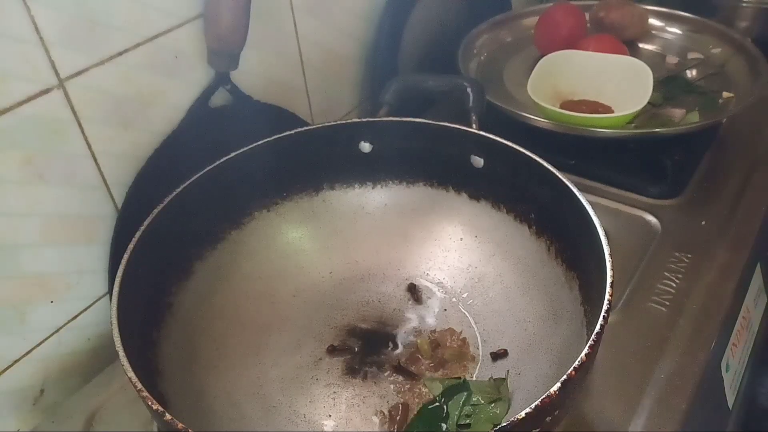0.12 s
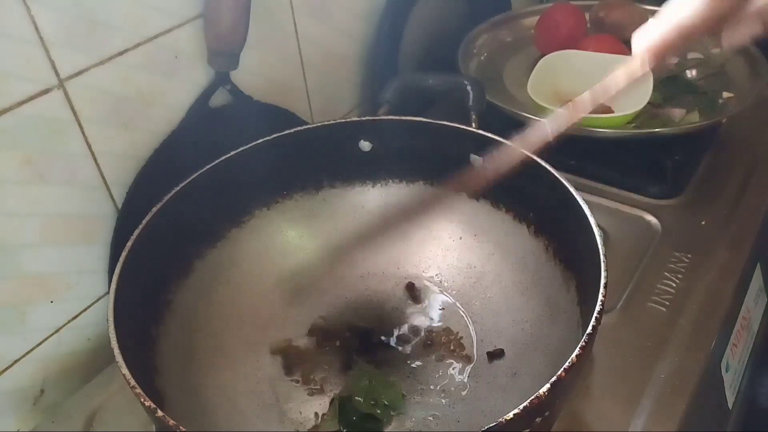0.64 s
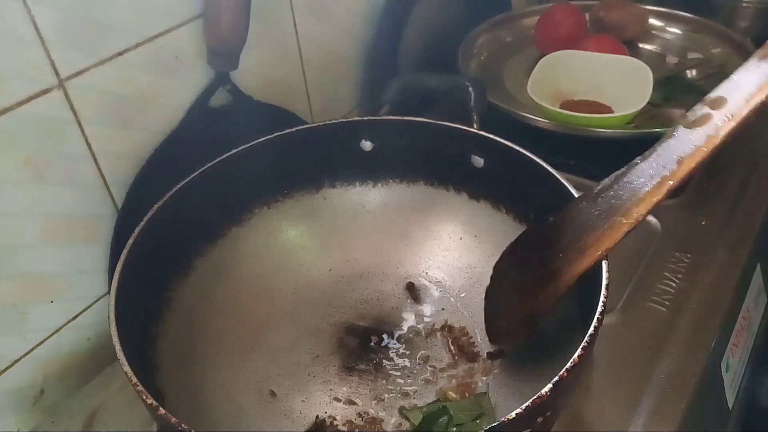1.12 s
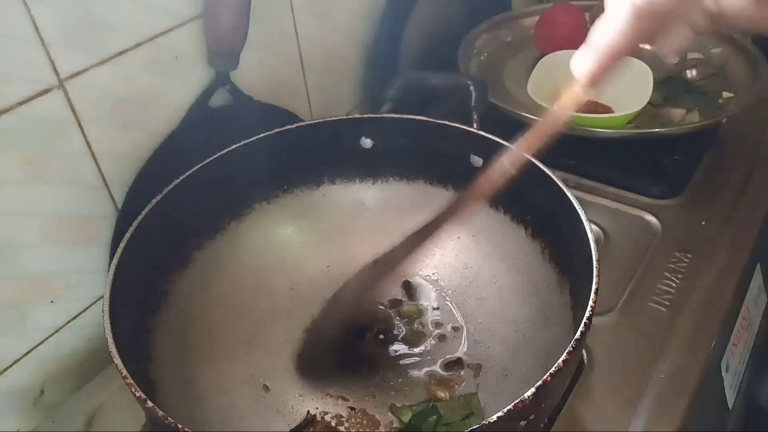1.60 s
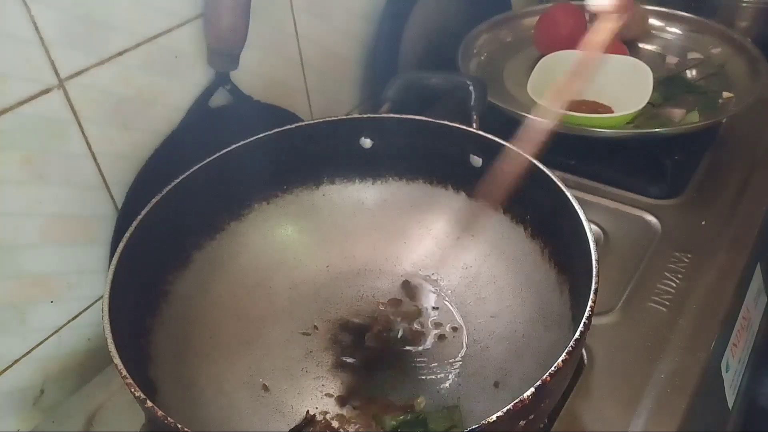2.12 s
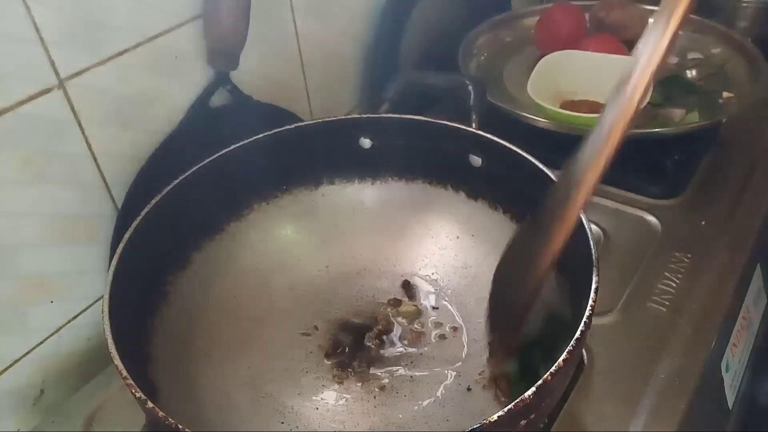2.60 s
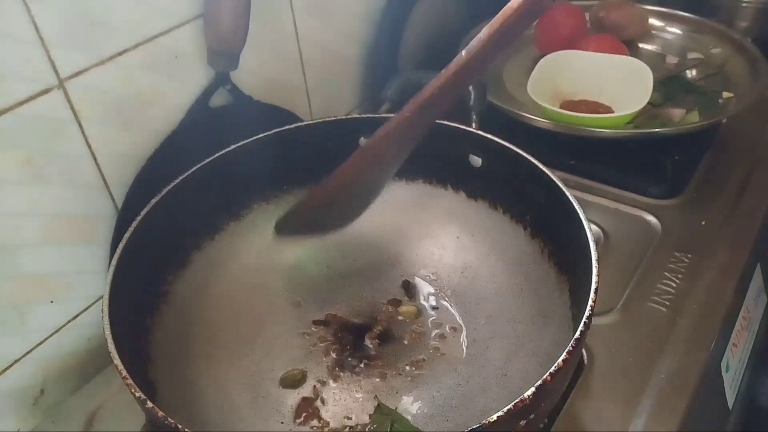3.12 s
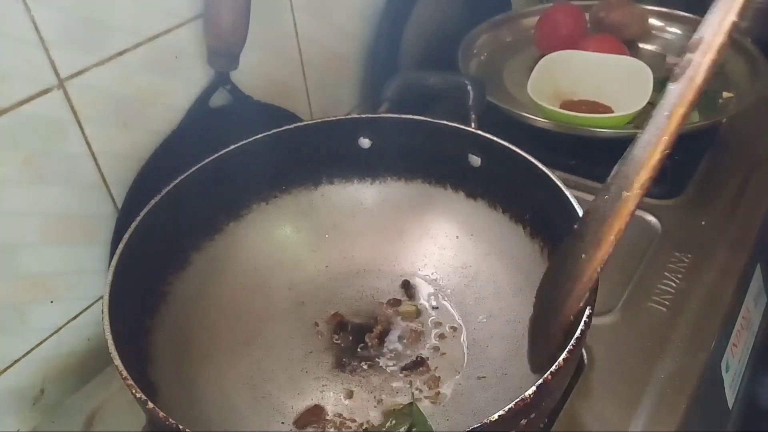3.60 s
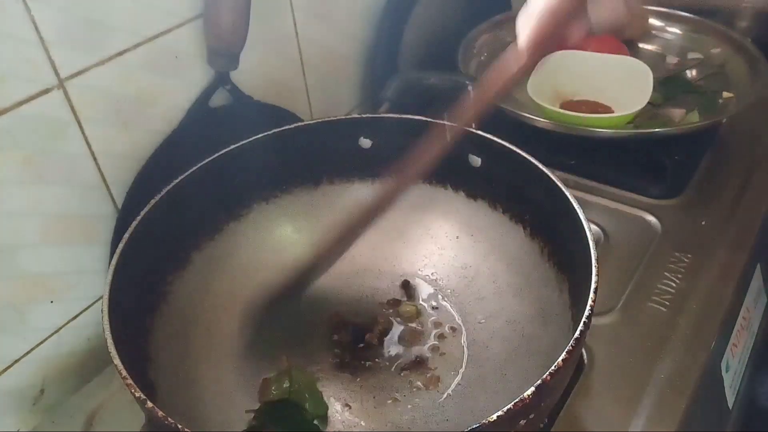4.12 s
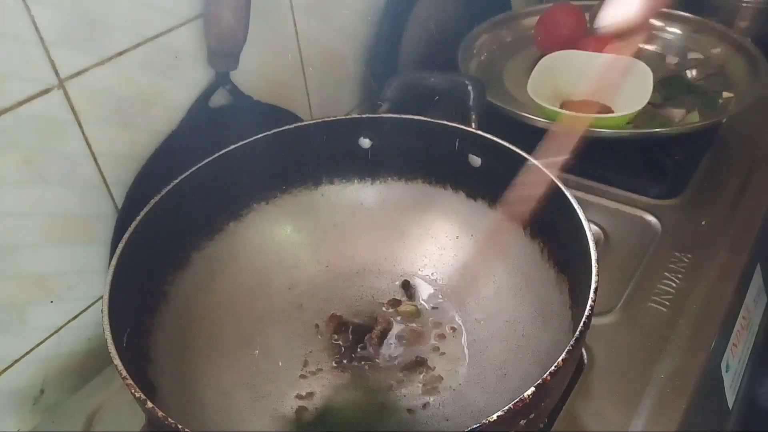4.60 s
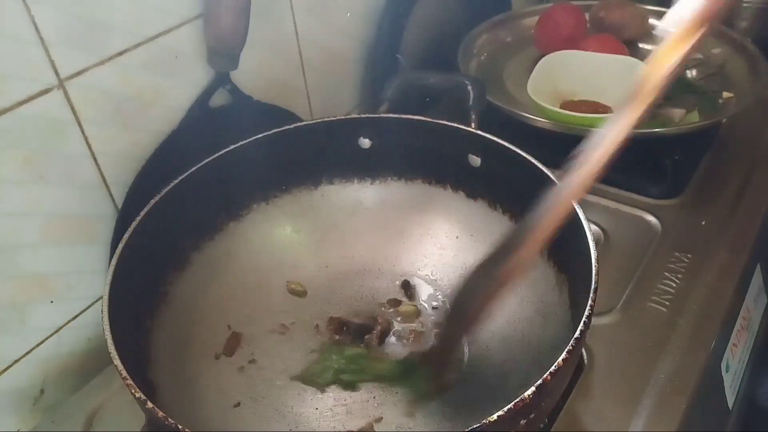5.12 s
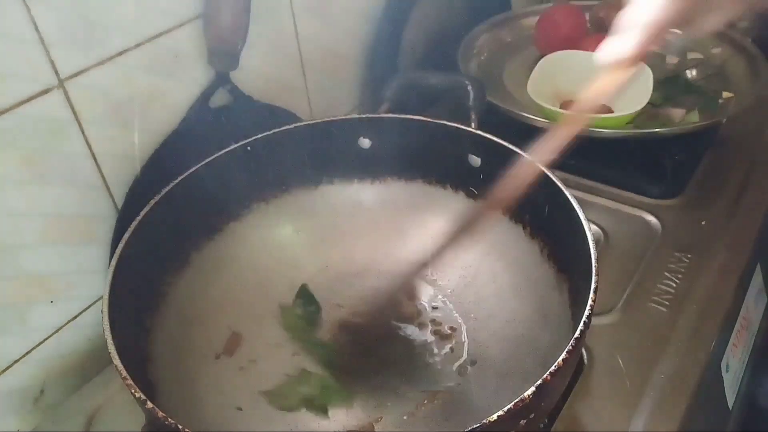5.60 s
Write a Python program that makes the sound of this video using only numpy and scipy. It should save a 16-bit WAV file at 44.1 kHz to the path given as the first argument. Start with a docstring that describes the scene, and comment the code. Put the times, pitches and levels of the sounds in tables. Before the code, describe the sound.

A close, bright recording of leaves and spices frying in a deep metal pan in a small tiled kitchen. At the start the sizzle is thin and grainy, with a cluster of sharp pops; a wooden spatula hits the pan wall at 0.05 s and scrapes briefly. A fuller, dull knock comes at 0.5 s, followed by softer drags. The fizz sinks near 1.25 s. From 1.55 to 1.75 s there are quick taps, scrapes and hard cracks, then thin, high steam squeals flutter until about 2.3 s, with a knock at 2.0 s. Frying swells around 2.5 s, dips near 2.8 s at a hollow thump, and a rough scrape follows a crack at 3.3 s. From 4 s the sizzle becomes dense and gurgling, strongest after 5 s, with loud spitting pops and small knocks at 5.2 to 5.7 s. Faint stove rumble and room noise lie below.

```python
"""Leaves and spices frying in a metal pan

Leaves and spices fry in hot oil in a deep metal pan, close to a small microphone.
Steam bubbles are random clicks ringing at many pitches; pops crack, ring and spit, mostly bursting drops.
Steam under a leaf sings as puffs through narrow drifting resonances.
A wooden spatula knocks on the wall and bottom of the pan, exciting its modes, and scrapes along it.
Below lie a low stove-top rumble, sparse echoes from tiled walls and quiet room noise."""
import sys
import numpy as np
from scipy import signal
from scipy.io import wavfile
from scipy.ndimage import uniform_filter1d

SR = 44100
rng = np.random.default_rng(int(sys.argv[2]) if len(sys.argv) > 2 else 0)


def wav_record(signal):
    """Record a signal, one row per channel, as 16-bit PCM in the file named by sys.argv[1]."""
    frames = np.transpose(np.atleast_2d(signal))
    bounded = np.clip(frames, -1, 1)
    # unit amplitude maps onto the largest positive 16-bit level
    quanta = np.round(bounded * 32767).astype(np.int16)
    wavfile.write(sys.argv[1], SR, quanta)


def decibels_to_gain(level_db):
    """Convert a level in decibels to a linear amplitude gain (20 dB per decade)."""
    exponent = np.asarray(level_db, float) / 20
    return 10 ** exponent


N = 253032
CLOCK = np.arange(N) / SR  # time of every sample in s

# what the bowl of the pan and the microphone make of the bubbles: pitch_hz [Hz], level_db [dB per Hz]
BOWL_COLOUR = [(300, -37), (520, -20.5), (740, -8), (900, -13.5), (1090, -18), (1350, -5.5), (1650, -11.5),
               (2200, -8.5), (3300, -4.5), (4400, -3), (6500, 2), (7900, -4), (10200, 0.5), (12500, -7),
               (15500, -10.5)]
# sharp cracks: bursting water drops, and at 0.054, 0.5085, 1.5683 and 3.2913 s the crack of a spatula blow:
# start_s [s], level_db [dB, peak before the wall echo and final filter],
# pitch_hz [Hz, of the ring], spit_db [dB, of the spit after it]
CRACKS = [(0.032, -43, 5940, -32), (0.042, -48, 5000, -40), (0.054, -21, 3500, -23),
          (0.0945, -26, 4200, -45), (0.1257, -18.5, 6940, -30), (0.2015, -26, 4630, -34),
          (0.2158, -21.5, 6330, -33), (0.2366, -26, 5430, -32), (0.2702, -36, 10600, -32.5),
          (0.3294, -18.5, 6800, -40), (0.4403, -32, 5410, -36), (0.474, -32, 11000, -30.5),
          (0.5085, -23.5, 3930, -42), (0.567, -25, 4340, -52), (0.669, -21, 10400, -38),
          (0.6887, -16.5, 11500, -62), (0.6977, -20, 10500, -50), (0.849, -31.5, 4200, -44),
          (0.9044, -37, 4100, -48), (0.9267, -24.5, 5700, -61), (0.9493, -21, 9800, -50),
          (1.043, -36, 5030, -35), (1.068, -31.5, 3180, -37), (1.0744, -17.5, 6800, -38),
          (1.1428, -36, 4000, -50), (1.1766, -26, 4000, -44), (1.2762, -38, 4600, -36),
          (1.2985, -24, 6500, -39), (1.3444, -28.5, 3070, -47), (1.3625, -29, 3080, -51),
          (1.3893, -24, 10300, -38), (1.405, -19, 9100, -42), (1.4335, -19.5, 4000, -55),
          (1.4734, -28, 3080, -25.5), (1.5056, -23.5, 2470, -40), (1.5388, -27.5, 2150, -50),
          (1.5683, -17, 2370, -33), (1.5775, -20, 6100, -45), (1.597, -29, 2500, -50),
          (1.6282, -16, 5900, -46), (1.7171, -14.5, 6060, -44), (1.7335, -27, 2980, -47),
          (1.7669, -34, 2300, -49), (1.7933, -24, 6100, -35), (1.8262, -25.5, 5380, -45),
          (1.9091, -24, 6560, -51), (1.93, -21, 5560, -41), (2.026, -23, 6140, -40),
          (2.0745, -20, 6800, -45), (2.2045, -20, 5100, -70), (2.3032, -47, 4650, -31),
          (2.3575, -29, 4260, -32), (2.432, -28, 5250, -41), (2.4553, -20, 5300, -41),
          (2.5844, -22.5, 3460, -45), (2.6968, -21.5, 6600, -47), (2.921, -23.5, 3420, -33),
          (3.031, -25, 9320, -47), (3.124, -20, 3230, -51), (3.2271, -16.5, 3960, -64),
          (3.2913, -18, 3030, -23), (3.3624, -32, 3430, -26), (3.3847, -29, 6160, -30),
          (3.531, -41, 6600, -32.5), (3.589, -17.5, 8400, -44), (3.6515, -14.5, 7500, -41),
          (3.8677, -18.5, 6460, -43), (3.9394, -22.5, 3900, -42), (3.977, -24, 3200, -42),
          (3.996, -18.5, 3040, -44), (4.0736, -18.5, 5100, -46), (4.1306, -22, 10200, -31),
          (4.2426, -21.5, 4070, -41), (4.27, -22, 3540, -50), (4.3834, -16.5, 6700, -33),
          (4.7658, -15.5, 6750, -26), (4.8404, -18, 6300, -46), (4.8951, -16, 4230, -38),
          (4.952, -17.5, 6100, -32), (5.0228, -21, 3610, -35), (5.0517, -14, 3650, -38),
          (5.4534, -23, 10300, -41), (5.5757, -13.5, 6700, -47)]
# modes of the pan: pitch_hz [Hz], middle_db [dB, struck mid-bottom], edge_db [dB, at the edge of the bottom],
# wall_db [dB, at the wall], t60_s [s, while ringing freely]
PAN_MODES = [(206.7, -28, -9.5, -8, 0.15), (276.3, -20, -7, -36, 0.23), (332, -15, -2, -6.5, 0.14),
             (522, -40, -2.5, -44, 0.029), (695, -10, 0, -33, 0.032), (745, 4, 6, -24, 0.034),
             (945.5, -34, -35, 3.5, 0.32), (1242, 9.5, -27, -35, 0.033), (1373, -8, -44, -4.5, 0.38),
             (1750, -24, -34, -30, .057), (1943, -27, -20, 1.5, 0.2), (2236, 0.5, -15, -23, 0.066),
             (2422, -18, -20, -5.5, 0.14), (2954, -31, -45, -34, 0.065), (3165, -28, -22, 5, 0.21),
             (4050, -8, -25, -21, 0.09), (4930, -22, -22, -24, 0.17), (5626, -24, -24, -13, .12)]


def evened(x):
    """Scales to rms 1."""
    return x / np.sqrt(np.mean(x ** 2) + 1e-20)


def add(mix, start_s, sound):
    """Mixes a sound in at a time."""
    part = mix[round(start_s * SR):][:len(sound)]
    part += sound[:len(part)]


def colour(x, points):
    """Causal minimum-phase filter with the given spectrum."""
    hz, db = np.transpose(points)
    log_gain = np.interp(np.log(np.fft.rfftfreq(8192, 1 / SR) + 1), np.log(hz), db) * np.log(10) / 20
    mirrored = np.concatenate([log_gain, log_gain[-2:0:-1]])
    phase = -signal.hilbert(mirrored).imag
    taps = np.fft.ifft(np.exp(mirrored + 1j * phase)).real[:4096]
    return signal.oaconvolve(x, taps)[:len(x)]


def band(x, lo_hz, hi_hz):
    """Band-pass."""
    return signal.sosfilt(signal.butter(2, [lo_hz, hi_hz], "bandpass", fs=SR, output="sos"), x)


def clicks(per_s, spread_db):
    """Random clicks of either sign, most small and a few large."""
    size = decibels_to_gain(spread_db * np.minimum(rng.exponential(1, N), 4))
    sign = rng.choice([-1., 1.], N)
    return size * sign * (rng.random(N) < per_s / SR)


def bubble(hz, cycles):
    """A short ring that dies by 1/e in so many cycles, energy 1."""
    turns = hz * np.arange(round(8 * cycles * SR / hz)) / SR
    ring = np.sin(2 * np.pi * turns) * np.exp(-turns / cycles)
    return ring / np.linalg.norm(ring)


def room_air():
    """Quiet room noise, heavy in the bass."""
    # spectrum of the room noise: pitch_hz [Hz], level_db [dB per Hz, before the rms is set]
    air_colour = [(20, 0.5), (45, -15.5), (80, -4.5), (200, -18.5), (400, -16), (1000, -30), (2000, -61)]
    level_db = -71
    return decibels_to_gain(level_db) * evened(colour(rng.standard_normal(N), air_colour))


def kitchen_echo(x):
    """Sparse echoes from tiled walls: random taps of either sign under an exponential decay."""
    taps = np.zeros(SR // 3)
    at = np.arange(200, len(taps) - 22, 22)
    taps[at + rng.integers(0, 22, len(at))] = rng.choice([-1., 1.], len(at))
    t60_s = 0.17
    taps *= decibels_to_gain(-60 * np.arange(len(taps)) / SR / t60_s)
    return signal.oaconvolve(x, taps / np.linalg.norm(taps))[:N]


def stove_rumble():
    """The stove top rumbles as the pan is pushed: low noise that swells with each push."""
    # pushes of the pan: start_s [s], length_s [s], level_db [dB]
    pushes = [(0.063, 0.15, -60.5), (0.425, 0.2, -66), (1.19, 0.18, -66), (1.45, 0.11, -66),
              (2.09, 0.26, -64), (2.782, 0.17, -65), (3.292, 0.19, -65), (4.2, 0.027, -67),
              (5.226, 0.17, -65), (5.58, 0.026, -59)]
    push = np.full(N, decibels_to_gain(-95.0))  # the stove is never quite still
    for start_s, length_s, level_db in pushes:
        add(push, start_s, decibels_to_gain(level_db) * signal.windows.tukey(round(length_s * SR), .6))
    return push * evened(band(band(rng.standard_normal(N), 85, 158), 85, 158))


def pan(place, scatter_db=0):
    """The ring of the pan after a sharp blow from mid-bottom to wall; each spot stirs the modes differently."""
    free_s, damped_t60_s = 0.057, 0.048  # the extra decay starts as the wood settles on the pan again
    twin_share, twin_split = 0.28, 0.0092  # a round pan rings in close pairs that beat
    hz, middle_db, edge_db, wall_db, t60_s = np.transpose(PAN_MODES)[:, :, None]
    t = np.arange(SR // 2) / SR
    place = np.clip(place, -1, 1)
    twins = np.sin(2 * np.pi * hz * t) - twin_share * np.sin(2 * np.pi * hz * (1 + twin_split) * t)
    far_db = wall_db if place > 0 else middle_db
    height = (1 - abs(place)) * decibels_to_gain(edge_db) + abs(place) * decibels_to_gain(far_db)
    decay_db = -60 * t / t60_s - 60 * np.maximum(t - free_s, 0) / damped_t60_s
    return (height * decibels_to_gain(scatter_db + decay_db) * twins).sum(0)


def strokes(loud):
    """Pressure of the wood on the metal, at its own level or simply on and off."""
    # the wood dragged over the metal: start_s [s], end_s [s], level_db [dB, mid-stroke]
    drags = [(0.048, 0.195, -52), (0.2, 0.306, -65), (0.53, 0.66, -57), (0.727, 0.965, -59.5),
             (1.566, 1.65, -59), (1.638, 1.717, -51.5), (1.713, 1.804, -55), (2.378, 2.645, -56.5),
             (2.87, 3.073, -58.5), (3.231, 3.462, -49.5), (3.476, 3.542, -58), (4.142, 4.294, -56),
             (4.284, 4.388, -65.5), (4.41, 4.514, -69), (4.942, 5.17, -63), (5.255, 5.493, -67),
             (5.568, 5.714, -63)]
    rise_db = 0.5  # from start to end of a stroke
    press = np.zeros(N)
    for start_s, end_s, level_db in drags:
        shape = signal.windows.tukey(round((end_s - start_s) * SR), .4)
        tilt_db = rise_db * np.linspace(-.5, .5, len(shape))
        add(press, start_s, decibels_to_gain(loud * (level_db + tilt_db)) * shape)
    return press


def scrape():
    """Small catches of the wood keep the low modes of the pan ringing."""
    catches = evened(band(clicks(per_s=1100, spread_db=3.5), 170, 422))
    damping_t60_s = 0.07  # the wood resting on the pan damps the metal
    damped = pan(0) * decibels_to_gain(-60 * np.arange(SR // 2) / SR / damping_t60_s)
    size = np.std(signal.oaconvolve(catches, damped))
    return signal.oaconvolve(strokes(loud=True) * catches, damped)[:N] / size


def knocks():
    """Wood on metal: a short push rings the pan; the clack of the wood dies at once."""
    # spatula blows: start_s [s], level_db [dB, peak within 200-1100 Hz],
    # place [-1 mid-bottom, 0 its edge, 1 wall; held to that range], contact_ms [ms, held to 0.03-3]
    blows = [(0.055, -27.5, 0.72, 0.15), (0.507, -24.5, 0.083, 0.37), (0.8, -48.5, 0.69, 0.42),
             (1.315, -39.5, -1.2, 0.087), (1.564, -39, 0.87, 0.099), (1.664, -28, -0.58, 0.038),
             (1.719, -33.5, 0.27, 0.098), (2.024, -27, -0.68, 0.09), (2.398, -37.5, 1, 0.1),
             (2.836, -24.5, -0.15, 0.87), (2.965, -31.5, 0.021, 1), (3.292, -33, 1, 0.02),
             (3.472, -34, -0.15, 0.55), (3.806, -33.5, -0.34, 0.86), (4.053, -34.5, -1.4, 0.1),
             (4.16, -38.5, 0.41, 0.17), (5.216, -32, -0.013, 0.74), (5.355, -34, -0.54, 0.23),
             (5.416, -38.5, -0.81, 0.38), (5.455, -38, 0.33, 0.35), (5.666, -38, -0.7, 0.12)]
    clack_db, clack_top_hz = 0.5, 4800
    thud_hz, thud_db, thud_t60_s = 674, 7, 0.0066  # dull thud of the blade, fullest at the edge of the bottom
    skid_db, skid_t60_s = -15.5, 0.11  # on the wall the wood skids and chatters on after the first touch
    out = np.zeros(N)
    t = np.arange(1500) / SR
    for (start_s, level_db, place, contact_ms), chance in zip(blows, rng.standard_normal((len(blows), 1500))):
        blow = pan(place, 1.5 * chance[:len(PAN_MODES), None])
        clack_decay = decibels_to_gain(-60 * t / .04) + 2.5 * decibels_to_gain(-60 * t / .008)
        blow[:1500] += decibels_to_gain(clack_db) * evened(band(chance, 450, clack_top_hz)) * clack_decay
        thud = decibels_to_gain(thud_db - 60 * t / thud_t60_s) * np.sin(2 * np.pi * thud_hz * t)
        blow[:1500] += (1 - np.clip(abs(place), 0, 1)) * thud
        push = t * np.exp(-t / (np.clip(contact_ms, .03, 3) / 1000 / 5))  # a longer contact dulls the treble
        touches = np.where(abs(chance) > 2.5, chance, 0)
        skid = touches * decibels_to_gain(skid_db - 60 * t / skid_t60_s) * max(place, 0)
        skid[0] = 1  # the first touch
        blow = signal.oaconvolve(np.convolve(blow, push / push.sum()), skid)
        add(out, start_s, decibels_to_gain(level_db) * blow / abs(band(blow, 200, 1100)).max())
    return band(band(out, 140, 16000), 140, 16000)


def sing():
    """Steam squeezing from under a leaf: quick tiny puffs through several narrow, drifting gaps at once."""
    # squeezes, each swelling and fading: peak_s [s, loudest moment], level_db [dB, there], pitch_hz [Hz, middle gap]
    squeezes = [(1.64, -34.5, 5790), (1.72, -43, 6370), (1.797, -38.5, 6200), (1.87, -45, 5900),
                (1.94, -31.5, 5780), (2.03, -46, 6200), (2.11, -34.5, 6530), (2.18, -47, 5550),
                (2.26, -41, 6840), (2.32, -37, 5320), (4.0, -44.5, 1390), (4.199, -45, 1383)]
    rise_db_per_s, fall_db_per_s = 227, 181
    width, scatter = 0.014, 0.06  # bandwidth and spacing of the gaps, as shares of the pitch
    out = np.zeros(N)
    t = np.arange(-SR // 4, SR // 4) / SR
    fade_db = np.where(t < 0, rise_db_per_s, fall_db_per_s) * abs(t)
    puffs = clicks(per_s=2500, spread_db=5.0)
    for (peak_s, level_db, hz), drifts in zip(squeezes, rng.standard_normal((len(squeezes), 3))):
        r = np.exp(-np.pi * width * hz / SR)
        chord = np.zeros(len(t))
        puff = puffs[round((peak_s + t[0]) * SR):][:len(t)]
        for gap, drift in zip((-1, 0, 1), drifts):
            gap_hz = hz * (1 + scatter * (gap + 3 * drift * t))
            turn = np.exp(2j * np.pi * np.cumsum(gap_hz) / SR)
            # shifted down to 0 Hz, smoothed and shifted back: a resonance that glides
            chord += decibels_to_gain(-4.0 * abs(gap)) * (turn * signal.lfilter([1 - r], [1, -r], puff / turn)).real
        add(out, peak_s + t[0], decibels_to_gain(level_db - fade_db) * evened(chord))
    return out


def frying():
    """Level of the fizz as it catches its breath, and the spread of bubble sizes."""
    # the frying: start_s [s], level_db [dB],
    # spread_db [dB, more large and fine bubbles beside the middle ones]
    heat_curve = [(0, -46, -5.5), (.25, -43, 6), (.55, -43.5, 3), (.9, -46, 6), (1.15, -44, 4),
                  (1.4, -45.5, 1.5), (1.65, -45, 11), (1.9, -37.5, 0.5), (2.3, -40.5, 2.5), (2.5, -34.5, 2),
                  (2.7, -37, 5.5), (3.05, -41.5, 4.5), (3.45, -38.5, 8.5), (3.75, -36.5, 2.5),
                  (4.05, -34, 5), (4.25, -34.5, 5.5), (4.55, -32.5, 0), (4.8, -33.5, 3.5),
                  (5.1, -31.5, 6.5), (5.74, -32, 3.5)]
    # lulls and a slight swell: centre_s [s], change_db [dB], half_width_s [s, to 1/e of the change]
    lulls = [(0, 1, 0.038), (0.462, -4.5, 0.035), (1.25, -5.5, 0.11), (2.796, -4, 0.096),
             (3.273, -6, 0.019), (3.467, -5, 0.023), (3.854, -4, 0.051), (4.622, -3.5, 0.018)]
    s, level_db, spread_db = np.transpose(heat_curve)
    fizz_db = np.interp(CLOCK, s, level_db)
    for centre_s, change_db, half_width_s in lulls:
        fizz_db = fizz_db + change_db * np.exp(-((CLOCK - centre_s) / half_width_s) ** 2)
    return fizz_db, np.interp(CLOCK, s, spread_db)


def size_class(hz):
    """0 for large bubbles, 1 for middle, 2 for fine ones."""
    return int(hz > 4000) + int(hz > 8100)


def surge():
    """How hard each bubble size boils from moment to moment: every crack is followed by a dying spit."""
    power = np.ones((3, N))
    fizz_db = frying()[0]
    t = np.arange(SR // 4) / SR
    for start_s, _, hz, spit_db in CRACKS:
        spit = decibels_to_gain(spit_db - fizz_db[round(start_s * SR)] - 60 * t / 0.047) ** 2
        for k in range(3):
            add(power[k], start_s, spit * decibels_to_gain(-4.0 * abs(k - size_class(hz))) ** 2)  # strongest near its own pitch
    # small spits: some shared by all sizes, some of each size alone
    common, *own = (clicks(per_s=36, spread_db=2.0) ** 2 for _ in range(4))
    small = signal.oaconvolve(common + 2.0 * np.array(own), decibels_to_gain(-60 * t / 0.096)[None] ** 2, axes=1)[:, :N]
    share = np.clip(.5 - 0.017 * (fizz_db + 41.0), .05, .9)  # fierce frying runs its spits together
    return np.sqrt(power * (1 - share + share * small / small.mean()))


def gurgles():
    """How strongly the deepest bubbles boil: sudden clumps that die away over a low simmer."""
    gurgle_db, per_s, t60_s = -2, 66, 0.11
    t = np.arange(SR // 4) / SR
    clumps = signal.oaconvolve(clicks(per_s, spread_db=2.5) ** 2, decibels_to_gain(-60 * t / t60_s) ** 2)[:N]
    return decibels_to_gain(gurgle_db) * np.sqrt(0.45 + 0.7 * abs(clumps) / clumps.mean())


def fizz():
    """Thousands of bubbles a second, in many sizes; large and fine ones swell on their own."""
    stir_db, stir_settle_s = 1, 0.061  # a stroke through the oil raises large bubbles
    fine_share, fine_db_per_s = 0.088, -0.23  # fine bubbles follow the spread in part and slowly fade
    fizz_db, spread_db = frying()
    large_db = spread_db + stir_db * uniform_filter1d(strokes(loud=False), round(stir_settle_s * SR))
    fine_db = fine_share * spread_db + fine_db_per_s * CLOCK
    heat = decibels_to_gain(0.83 * (fizz_db + 39))  # fiercer frying means more bubbles as well as louder ones
    rings = np.zeros((3, N))
    for hz in np.geomspace(500, 15000, num=26):
        train = clicks(per_s=heat * (40 + .09 * hz), spread_db=2.0) / np.sqrt(heat)
        ring = bubble(hz, cycles=2.32) * np.sqrt(hz)  # wider bands carry more energy
        rings[size_class(hz)] += signal.oaconvolve(evened(train), ring)[:N]
    crack = evened(clicks(per_s=heat * 260, spread_db=1.5) / np.sqrt(heat))  # bursting skins click in all bands
    skins = np.array([band(crack, 300, 4000), band(crack, 4000, 8100), band(crack, 8100, 17000)])
    boiling = (evened(rings) + 0.76 * evened(skins)) * surge()
    large, middle, fine = (colour(part, BOWL_COLOUR) for part in boiling)
    deep = band(band(large, 450, 1000), 450, 1000)
    large = band(band(large, 1120, 18000), 1120, 18000)
    large += decibels_to_gain(0.66 * (fizz_db + large_db + 31.5)) * gurgles() * deep  # the deepest gurgle needs fierce frying
    swell = decibels_to_gain(large_db - large_db.mean()) * large + middle + decibels_to_gain(fine_db - fine_db.mean()) * fine
    usual_rms = np.median(np.sqrt(abs(uniform_filter1d(middle ** 2, size=2000))))
    return decibels_to_gain(fizz_db) * swell / usual_rms


def pops():
    """A short noise burst and a dying ring, thrown back by the near wall: bursting drops and a few blows' cracks."""
    out = np.zeros(N)
    t = np.arange(220) / SR
    for (start_s, level_db, hz, _), spray in zip(CRACKS, rng.standard_normal((len(CRACKS), 220))):
        crack = colour(spray * decibels_to_gain(-60 * t / 0.0056), BOWL_COLOUR)
        pop = evened(band(crack, 540, min(1.53 * hz, 18000)))  # low-pitched ones crack duller
        ring = bubble(hz, cycles=2.0)[:220]
        pop[:len(ring)] += 10.0 * ring
        pop /= abs(pop).max()
        add(out, start_s, decibels_to_gain(level_db) * pop)
        add(out, start_s + .0014, decibels_to_gain(level_db - 5) * pop)  # off the near wall
    return band(out, 700, 18000)


def scene():
    """Everything in the pan, the echo of the sharp sounds with the rumble, and the quiet room noise."""
    sharp = pops() + knocks() + scrape() + stove_rumble()
    return (fizz() + sing() + sharp + decibels_to_gain(-4.0) * kitchen_echo(sharp) + room_air())[None]


def band_limit(x):
    """A steep low-pass at the top of the band."""
    return signal.sosfilt(signal.butter(12, 16580, fs=SR, output="sos"), x)


def record(dry):
    """The small microphone loses the deep bass, and the top is cut off."""
    edge_hz = 15450
    thin = signal.sosfilt(signal.butter(1, 60, "highpass", fs=SR, output="sos"), dry)
    lowpass = signal.firwin(511, edge_hz, window=("kaiser", 9), fs=SR)
    thin = signal.oaconvolve(thin, lowpass[None], "same")
    return band_limit(thin)


dry = scene()
out = record(dry)
wav_record(out)
```